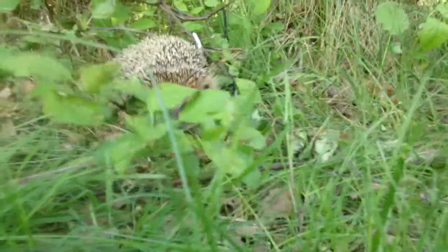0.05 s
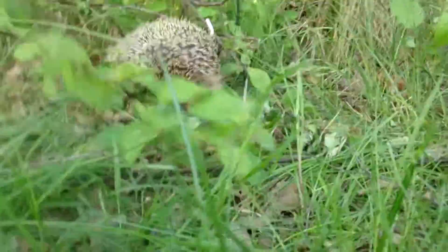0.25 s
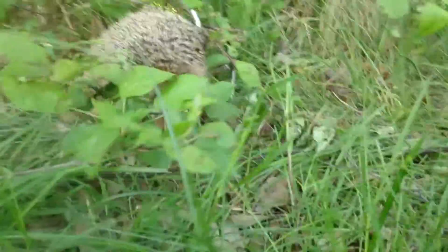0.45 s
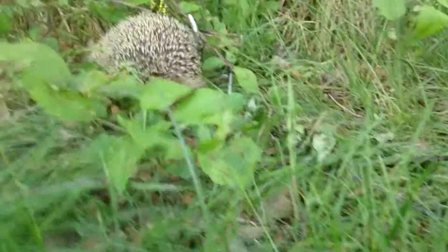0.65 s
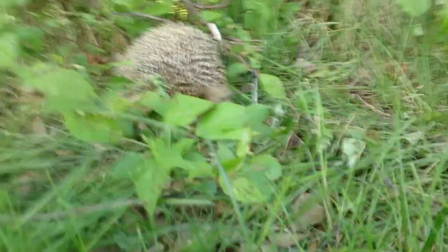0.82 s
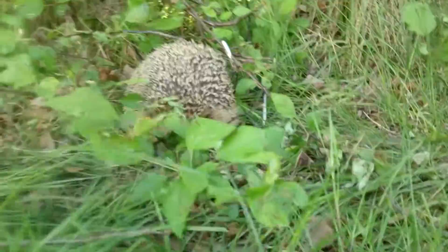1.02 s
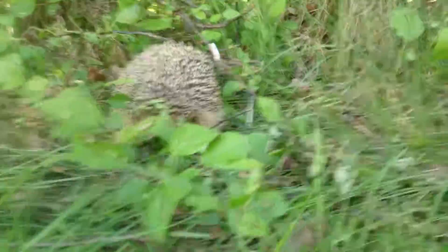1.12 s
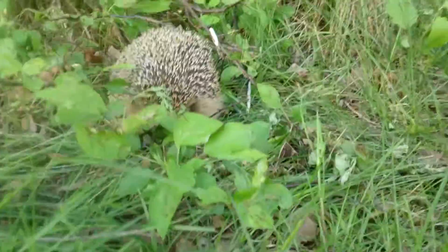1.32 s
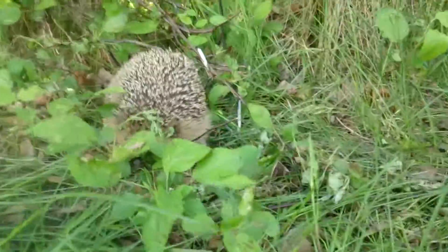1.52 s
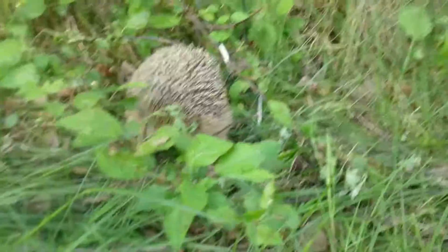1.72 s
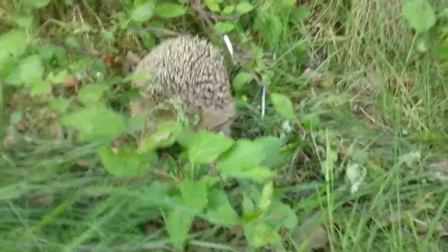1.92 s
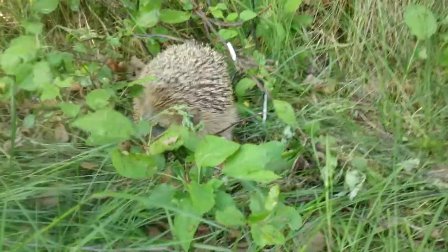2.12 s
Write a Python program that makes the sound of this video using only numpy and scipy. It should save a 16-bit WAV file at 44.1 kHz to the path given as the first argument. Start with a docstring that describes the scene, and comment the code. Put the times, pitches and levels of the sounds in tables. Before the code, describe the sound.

Five short, breathy huffs come from a hedgehog at a steady pace outdoors. Close knocks and dull rubbing from handling the microphone cluster in the middle, with a few ticking stems, light leaf rustles and faint distant birds.

```python
"""Outdoors in the grass, a hedgehog huffs five times. Its airway flutters, chopping each breath into a
fast-pulsing puff, and its nostrils add a thin hiss on top. Leaves brush past each other and stems tick.
Close by, fingers rub, scuff and knock on a hand-held camera with a left and a right microphone.
Birds whistle far off, over a low hum and the faint hiss of the open air."""
import sys
import numpy as np
from scipy import signal
from scipy.fft import rfft, irfft, next_fast_len
from scipy.io import wavfile
from scipy.ndimage import uniform_filter1d

SR = 44100
rng = np.random.default_rng(int(sys.argv[2]) if len(sys.argv) > 2 else 0)


def output_pcm(signal):
    """Save a mono or channel-first signal as 16-bit PCM at the path in sys.argv[1].

    Samples are clipped to [-1, 1] before scaling.
    """
    pcm = np.clip(np.atleast_2d(signal).T, -1, 1) * 32767
    wavfile.write(sys.argv[1], SR, np.round(pcm).astype(np.int16))


N = 94815

# A "colour" says how strong the low and high parts of a sound are, compared with each other.
# A "lean" says how much louder the left side is than the right.
# Loudness of the hum (time [s], level [dB])
HUM_LEVEL = [(0.0, -53), (0.65, -50), (0.67, -50.5), (1.0, -54.5), (1.02, -58), (2.15, -64)]
# Colour of the open air (frequency [Hz], level [dB])
AIR_COLOUR = [(290, -30.5), (500, -4), (960, -8.5), (1210, -15), (1950, -11.5), (3150, -17),
              (4280, -18), (12100, -20), (16000, -23)]

# Rise and fall of the hand's rubbing (time [s], level [dB])
RUB_LEVEL = [(0, -52.5), (.18, -56.5), (.3, -48), (.36, -46), (.43, -50.5), (.51, -51.5), (.6, -43),
             (.66, -45.5), (.77, -55), (.83, -46.5), (.88, -49.5), (.97, -46), (1.1, -45.5), (1.18, -52.5),
             (1.29, -47.5), (1.39, -54), (1.6, -57), (1.74, -62), (2.0, -61), (2.15, -63.5)]
# Dull colour of the rubbing (frequency [Hz], level [dB])
RUB_COLOUR = [(25, -10), (60, -2), (130, -0.5), (260, 1), (400, -12.5), (700, -20.5), (1500, -31.5),
              (3000, -51.5), (8000, -58)]

# Leaves brushing (start [s], length [s], level [dB], lean [dB])
LEAF_BRUSHES = [(-.01, 0.014, -47, 6), (0.038, .01, -56, 11.5), (.287, 0.006, -34, 8.5),
                (0.301, 0.095, -41.5, 4), (0.422, 0.044, -55.5, 4.5), (0.619, 0.0075, -52, 6),
                (1.062, 0.054, -57, 4), (1.255, 0.035, -56, 3)]
# Stems ticking (time [s], level [dB], lean [dB], treble limit [Hz])
STEM_TICKS = [(0.039, -50, 8, 15500), (.2985, -23.5, 6, 16000), (0.4144, -26.5, 7, 16200),
              (0.6149, -29, 4, 16000), (0.9712, -39.5, -4, 12500), (1.097, -50, 0, 14000),
              (1.268, -49, 0, 15500), (1.283, -39.5, -16, 9400), (1.6358, -43, 10, 12500)]
# Bright colour of leaves and stems (frequency [Hz], level [dB])
LEAF_COLOUR = [(900, -12), (1900, -10.5), (2700, -19), (4700, -16.5), (6300, -17.5), (7200, -23),
               (8200, -12.5), (10100, -1.5), (13000, -1), (16000, -4)]
# Extra lean of leaves and stems (frequency [Hz], lean [dB])
LEAF_LEAN = [(2000, -4.5), (6000, -2.5), (10000, -4.5), (12500, 0), (15000, 8)]

# Bird notes (start [s], length [s], first pitch [Hz], middle pitch [Hz], last pitch [Hz], level [dB])
BIRD_NOTES = [(0.025, 0.11, 2150, 2335, 2450, -66.5), (.558, 0.0297, 2830, 2370, 2060, -64),
              (.7, 0.057, 2200, 2640, 3000, -69.5), (0.829, 0.03, 2280, 2260, 2410, -68),
              (1.198, .075, 2100, 2320, 2140, -62.5), (1.414, 0.028, 3450, 3380, 3330, -73)]

# The hedgehog's breaths (start [s], length [s], puff level [dB], hiss level [dB], flutter rate [Hz],
# snout ring compared with the puff [dB], hiss rise time [s], hiss lean [dB])
HUFFS = [(0.201, 0.061, -34, -44, 199.6, -22.5, 0.036, -1), (0.661, 0.063, -33, -52, 224.8, -52, 0.02, 1.5),
         (0.993, 0.0803, -35, -50.5, 235.6, -26.5, .055, -0.5),
         (1.442, 0.11, -35.5, -48, 217.6, -24.5, 0.03, -0.5),
         (1.837, 0.077, -41, -62, 229.1, -23, 0.043, -3.5)]
# Low colour of the puff (frequency [Hz], level [dB])
PUFF_COLOUR = [(70, -23), (133, -14.5), (200, -3), (280, -1), (390, -6.5), (620, -2.5), (950, -6.5),
               (1100, -16), (1320, -36), (1700, -28), (2300, -25), (3500, -47)]
# Colour of the ringing snout (frequency [Hz], level [dB])
SNOUT_COLOUR = [(1000, -20), (1400, -4), (1680, 5.5), (1850, 1.5), (2100, -13.5), (2400, -49), (4000, -55)]
# Thin colour of the nostril hiss (frequency [Hz], level [dB])
HISS_COLOUR = [(2000, -47), (2800, -17), (3400, -24), (4000, -5.5), (4800, -18), (5500, -7), (6900, -21.5),
               (8000, -9), (10000, 2.5), (12800, 3), (16000, -8)]
# Extra lean of the nostril hiss (frequency [Hz], lean [dB])
HISS_LEAN = [(3000, 4), (9000, 5.5), (11000, 3.5), (13000, 15), (15000, 18)]

# Short slides of the grip (start [s], length [s], level [dB])
GRIP_SCUFFS = [(0.302, 0.013, -51), (.392, 0.026, -48), (0.517, 0.023, -58), (0.799, 0.015, -66),
               (0.954, 0.029, -54), (1.221, 0.093, -61.5)]
# Colour of a scuff (frequency [Hz], level [dB])
SCUFF_COLOUR = [(150, -13), (300, -1.5), (800, -5), (1200, -8.5), (1900, -13), (2800, -26), (6000, -38)]

# Finger knocks (time [s], level [dB], ring pitch [Hz], click gain [dB], treble limit [Hz],
# thud gain [dB], left side gain [dB])
FINGER_KNOCKS = [(.362, -24, 310, 1.5, 2730, -9, -7), (0.46, -32, 176, -17, 900, -10, -2.5),
                 (0.5774, -17, 278, -2, 1500, -27, -18), (0.599, -31, 260, -10, 1100, -28, -19),
                 (0.6158, -6.5, 194, -13, 4100, -9, -5), (.7165, -11, 274, -7, 1070, -25, -0.5),
                 (0.799, -22, 258, -11, 990, -10, -0.5), (0.827, -28, 232, -12, 900, -2.5, -2),
                 (0.9718, -4.5, 269, 1, 2520, -10, -9.5), (1.059, -7, 272, -8.5, 1650, -41, -9),
                 (1.121, -29, 267, 1, 1190, -22.5, 1), (1.2839, -6, 256, -4, 2830, -39, -9.5),
                 (1.327, -23.5, 237, -20, 500, -6, -10), (1.3583, -14, 260, 5, 1250, -22, -14),
                 (1.778, -33.5, 260, -20, 550, -18, 3), (1.984, -33.5, 235, -22, 694, -10, -5),
                 (2.085, -36.5, 245, -20, 890, -2, -6)]
# Colour of a knock's click (frequency [Hz], level [dB])
CLICK_COLOUR = [(200, -26), (550, 0.5), (900, -18), (1400, 4.5), (2100, -4.5), (3000, -14.5), (6000, -0.5),
                (12000, 6)]

TIME = np.arange(N) / SR  # seconds


def undb(db):
    """Turn decibels into a number to multiply by."""
    return 10 ** (np.asarray(db) / 20)


def unit(x):
    """Scale a signal to an average power of 1."""
    return x / np.sqrt(np.mean(x ** 2) + 1e-18)


def lean(db):
    """Left and right gains that make the left side louder by db."""
    return undb(np.array([[.5], [-.5]]) * db)


def curve(x, points):
    """Join a table's points with straight lines and read the value at x."""
    return np.interp(x, *np.array(points).T)


def colour(x, points, lean_points=None):
    """Filter a sound to give it a colour and, if asked, a lean that depends on frequency."""
    size = next_fast_len(N + SR // 4, real=True) * 2
    octave = np.log2(np.maximum(np.arange(size // 2 + 1) * SR / size, 1))
    read = lambda table: curve(octave, [(np.log2(hz), db) for hz, db in table])
    cepstrum = irfft(np.log(unit(undb(read(points)))))
    # Folding this onto its first half makes the filter ring after a sound, never before it.
    cepstrum[1:size // 2] *= 2
    cepstrum[size // 2 + 1:] = 0
    response = np.exp(rfft(cepstrum))
    if lean_points is not None:
        response = response * lean(read(lean_points))
    return irfft(rfft(x, size) * response)[..., :N]


def cut(x, side, hz, order):
    """Keep the "low" or "high" side of hz; a bigger order cuts more sharply."""
    return signal.sosfilt(signal.butter(order, hz, side, fs=SR, output="sos"), x + 1e-18)


def wander(per_s):
    """A smooth random wobble, about 1 in size."""
    hold = int(SR / per_s)
    steps = np.repeat(rng.standard_normal(N // hold + 1), hold)
    return unit(uniform_filter1d(uniform_filter1d(steps, hold), hold)[:N])


def burst(start, length, rise_s, tail_s):
    """A loudness shape that rises, holds and dies away."""
    age = TIME - start
    rise = np.sin(np.pi / 2 * np.clip(age / rise_s, 0, 1))
    return rise * np.exp(-np.maximum(age - length, 0) / tail_s)


def grains(per_s, scatter_db):
    """Tiny random hits of uneven size."""
    hits = (rng.random(N) < per_s / SR) * rng.choice([-1, 1], N)
    return unit(hits * undb(scatter_db * np.minimum(rng.exponential(size=N), 4)))


def later(x, seconds):
    """Delay a sound."""
    return np.interp(TIME - seconds, TIME, x)


def hum_and_air():
    """A low, wavering hum and the faint hiss of the open air."""
    hz = 85 * (1 + 0.019 * wander(per_s=11.75))
    tone = unit(np.sin(2 * np.pi * np.cumsum(hz) / SR))
    hum_db = curve(TIME, HUM_LEVEL) + 0.5 * wander(per_s=13.5)
    air = undb(-69) * colour(rng.standard_normal((2, N)), AIR_COLOUR)
    return tone * undb(hum_db) + air


def hand_rub():
    """The hand creeps over the camera in small, dull slips, partly shared by both microphones."""
    shared, left, right = (grains(per_s=700, scatter_db=2.5) for _ in range(3))
    share = 0.43
    slips = np.sqrt(share) * shared + np.sqrt(1 - share) * np.array([left, right])
    loudness = undb(curve(TIME, RUB_LEVEL) + 2)
    return colour(slips * loudness, RUB_COLOUR) * lean(-3)


def leaves():
    """Leaves slide past each other in many tiny hits; now and then a stem ticks."""
    loudness = sum(undb(db) * lean(lean_db) * burst(start, length, rise_s=0.0034, tail_s=0.016)
                   for start, length, db, lean_db in LEAF_BRUSHES)
    hits = np.array([grains(per_s=3200, scatter_db=1) for _ in range(2)])
    flicker = undb(2.5 * wander(per_s=250))
    rustle = loudness * hits * flicker
    for start, db, lean_db, top_hz in STEM_TICKS:
        fade = burst(start, 0, rise_s=1 / SR, tail_s=0.0013)
        tick = undb(db) * lean(lean_db) * fade * rng.standard_normal((2, N))
        rustle += cut(tick, "low", top_hz, order=4)
    return colour(rustle, LEAF_COLOUR, LEAF_LEAN)


def birds():
    """Faint, gliding whistles, blurred by echoes from the trees."""
    song = np.zeros(N)
    waver = 1 + .022 * wander(per_s=200)
    for start, length, first, middle, last, db in BIRD_NOTES:
        progress = np.clip((TIME - start) / length, 0, 1)
        glide = np.polyfit([0, .5, 1], [first, middle, last], 2)
        hz = np.polyval(glide, progress) * waver
        swell = np.sqrt(np.abs(np.sin(np.pi * progress)))
        song += undb(db) * swell * np.sin(2 * np.pi * np.cumsum(hz) / SR)
    echo_s = .02
    fade = np.exp(-TIME[:SR // 2] / echo_s) / np.sqrt(echo_s * SR / 2)
    echoes = rng.standard_normal((2, SR // 2)) * fade
    return song + undb(-4) * signal.fftconvolve(song[None], echoes, axes=1)[:, :N]


def hedgehog_huffs():
    """Each flutter of the airway lets out a pulse and a gust; the snout rings and the nostrils hiss."""
    rise_s, fall_s = .018, 0.024
    open_share, gust_gain = 0.57, undb(3)  # a gust fades over this share of one flutter
    puffs, snout, hiss = np.zeros(N), np.zeros(N), np.zeros((2, N))
    for start, length, puff_db, hiss_db, hz, snout_db, hiss_rise_s, lean_db in HUFFS:
        gap_chance, size_chance = rng.standard_normal((64, 2)).T
        beats = start - rise_s + np.cumsum(np.exp(.07 * gap_chance)) / hz  # unevenly spaced
        beat_samples = (beats * SR).astype(int)
        pulses = np.bincount(beat_samples, undb(0.5 * size_chance), N)[:N] * np.sqrt(SR / hz)
        cycle = np.interp(TIME, beats, np.arange(len(beats))) % 1  # runs 0 to 1 between beats
        opening = np.exp(-cycle / open_share) / np.sqrt(open_share / 2)
        gusts = gust_gain * opening * rng.standard_normal(N)
        rise = np.clip((TIME - start) / rise_s + 0.35, 0, 1)
        fall = np.clip((start + length - TIME) / fall_s + .5, 0, 1)
        puff = undb(puff_db) * rise * fall * (gusts - pulses) / np.hypot(1, gust_gain)
        puffs += puff
        snout += undb(snout_db) * puff
        # The hiss starts to fade just before the puff ends, and lingers after it.
        swell = burst(start, length - 0.01, hiss_rise_s, tail_s=0.018)
        hiss += undb(hiss_db) * lean(lean_db) * swell * (0.69 + .35 * opening)
    left, right = colour(puffs, PUFF_COLOUR) * lean(4.5) + colour(snout, SNOUT_COLOUR) * lean(14)
    nostrils = colour(hiss * rng.standard_normal((2, N)), HISS_COLOUR, HISS_LEAN)
    return np.array([left, later(right, seconds=.0002)]) + nostrils


def grip_scuffs():
    """Now and then the grip slides a little farther, with a short, dry scrape."""
    loudness = sum(undb(db) * burst(start, length, rise_s=0.002, tail_s=0.0049)
                   for start, length, db in GRIP_SCUFFS)
    slips = np.array([grains(per_s=1500, scatter_db=1.43) for _ in range(2)])
    return colour(loudness * slips, SCUFF_COLOUR) * lean(-12.5)


def finger_knocks():
    """A finger bumps the camera: a click, a very short ring of the case and a low thud."""
    rise_s, ring_cycles = 0.000657, .7
    thud_hz, thud_fade_s = 110, 0.0034
    left, right = np.zeros(N), np.zeros(N)
    clean_click = colour(signal.unit_impulse(N), CLICK_COLOUR)[:SR // 50]
    for start, db, hz, click_db, top_hz, thud_db, left_db in FINGER_KNOCKS:
        age = np.maximum(TIME - start + rise_s, 0)
        rise = 1 - np.exp(-age / rise_s)
        swing = np.sin(2 * np.pi * hz * age) * np.exp(-age * hz / ring_cycles) * rise
        ring = -np.gradient(swing) * SR / (2 * np.pi * hz)  # follows the speed of the swinging case
        thud = undb(thud_db) * np.sin(2 * np.pi * thud_hz * age) * np.exp(-age / thud_fade_s)
        touch = 0.76 * burst(start, 0, rise_s=1 / SR, tail_s=.0007) * rng.standard_normal(N)
        touch[int(start * SR)] -= 4  # one sharp spike leads the gritty noise
        click = undb(click_db) * signal.oaconvolve(touch, clean_click)[:N]
        knock = undb(db) * cut(ring + thud + click, "low", top_hz, order=6)
        left += undb(left_db) * knock
        right += knock
    left = later(left, seconds=0.000589)  # the left microphone is farther from the fingers
    return cut(np.array([left, right]), "high", hz=65, order=2)  # little deep bass gets in


def scene():
    """Add all the sounds together, in stereo."""
    return (hedgehog_huffs() + finger_knocks() + leaves() + birds()
            + hand_rub() + grip_scuffs() + hum_and_air())


def record(dry):
    """The camera cuts off the very highest treble."""
    top_hz = 16000
    return signal.sosfilt(signal.ellip(10, .2, 80, top_hz, fs=SR, output="sos"), dry)


dry = scene()
out = record(dry)
output_pcm(out)
```